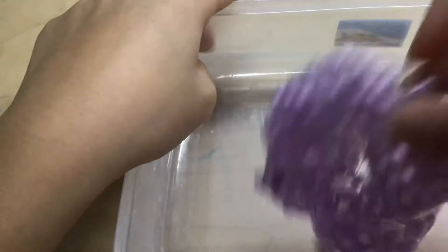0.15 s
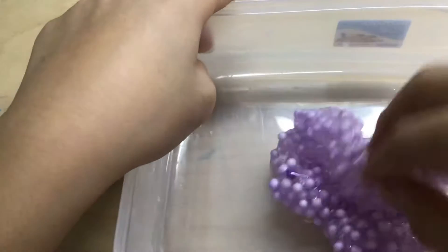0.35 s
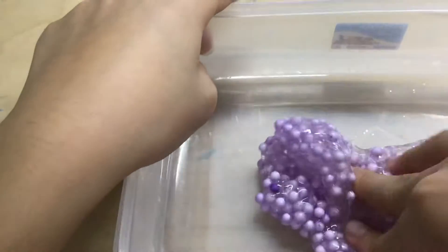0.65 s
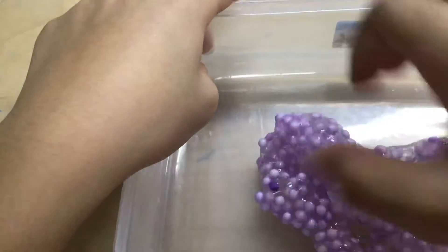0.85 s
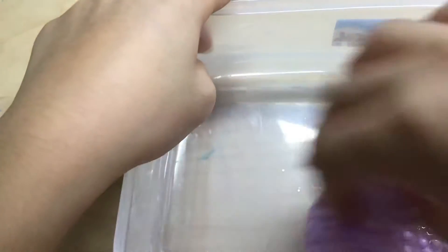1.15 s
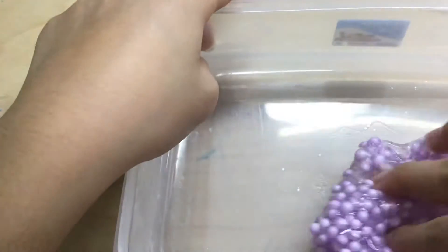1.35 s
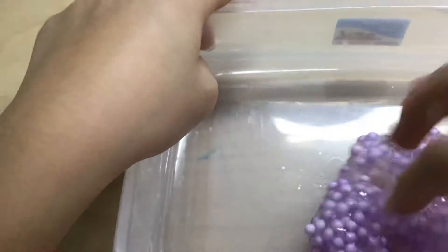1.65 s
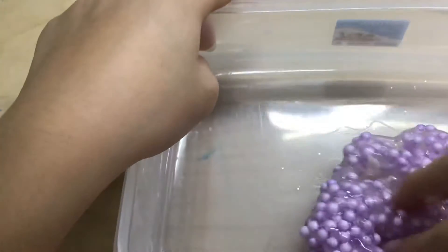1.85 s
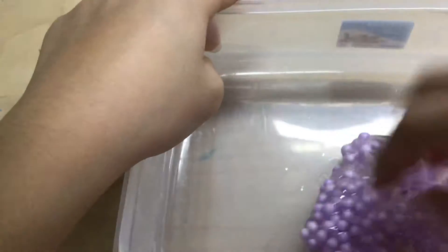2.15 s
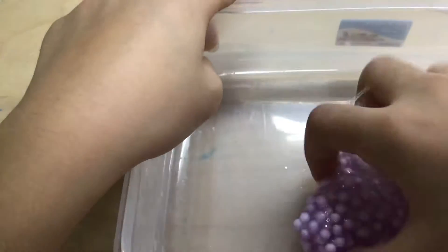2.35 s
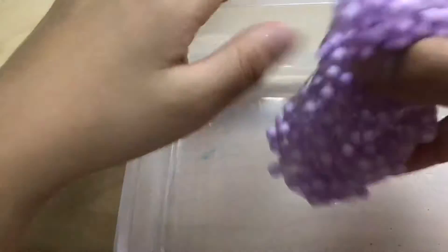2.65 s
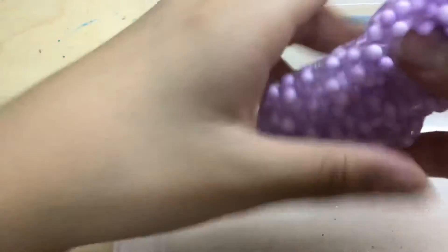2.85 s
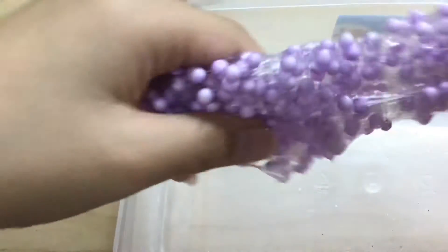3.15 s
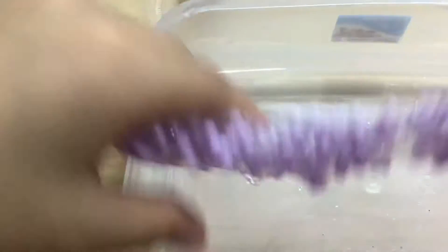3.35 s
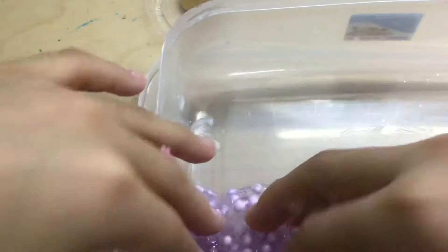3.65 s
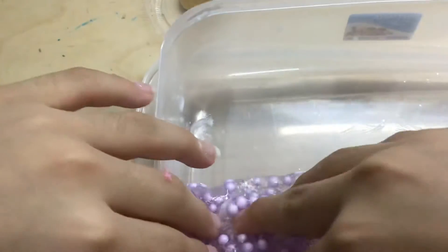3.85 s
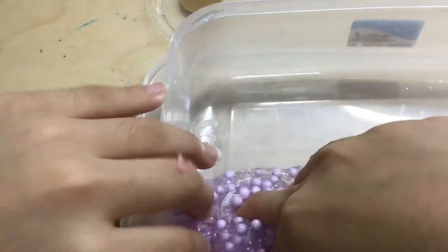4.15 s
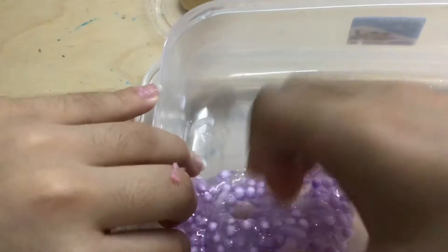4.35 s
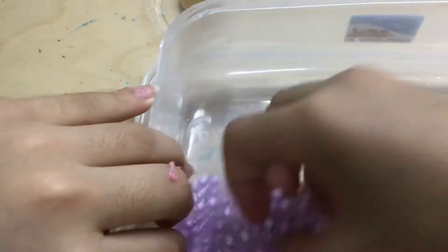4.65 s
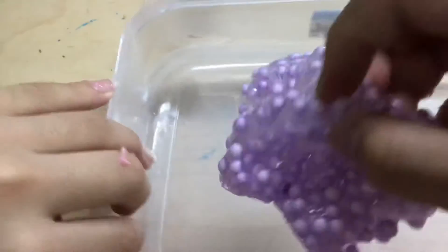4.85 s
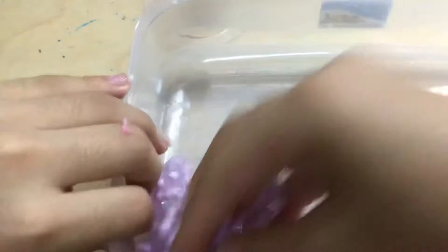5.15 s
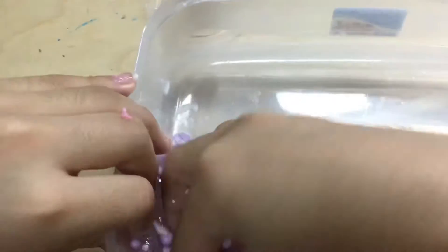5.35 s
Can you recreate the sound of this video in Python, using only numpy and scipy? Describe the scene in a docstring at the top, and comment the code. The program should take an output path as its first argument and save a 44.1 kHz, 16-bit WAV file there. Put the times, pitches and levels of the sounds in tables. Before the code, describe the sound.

Very close to the microphone, hands squeeze slime full of foam beads in a thin plastic tub. Small crisp pops, dull plastic knocks and soft low thumps come in clusters, thickening to the hardest hit just after two seconds. After a quieter stretch with a faint slide, a slap restarts the crunching, then a quick finger stutter, sharp snaps, a short rest and a final crackling flurry.

```python
"""A lump of slime full of foam beads is kneaded and slapped about in a thin plastic tub, close to the microphone.
It opens with a soft floor thump and quick clusters of bursting air pockets (torn film noise, a ringing pocket) and
wall knocks (rough contact on modes). They thicken to the hardest hit at 2.26 s, with grainy crackle in between.
After a lull with a hissing slide, a slap at 3.37 s starts them again; at 3.7 s a finger judders in eight slips.
Sharp pops follow from 4.25 s, then a short rest, and a last flurry from 5.1 s ends in dense crackle."""
import sys
import numpy as np
from scipy import signal
from scipy.fft import rfft, irfft
from scipy.io import wavfile
from scipy.ndimage import uniform_filter1d

SR = 44100
rng = np.random.default_rng(int(sys.argv[2]) if len(sys.argv) > 2 else 0)


def materialize(psi):
    """Save the field psi as 16-bit PCM at rate SR to the path in sys.argv[1].

    A 1-D psi becomes a single channel; in a 2-D psi each row is a channel.
    """
    bounded = np.clip(np.atleast_2d(psi).T, -1, 1)
    quanta = np.round(bounded * 32767).astype(np.int16)
    wavfile.write(sys.argv[1], SR, quanta)


N = 242991

# air pockets bursting: t/s, peak level/dB, pocket f/Hz, nominal tear length/s, film hiss level re pocket/dB
POPS = [(0.163, -40, 3300, 0.0062, -10), (0.1783, -32.5, 3060, 0.0026, -4),
        (0.181, -27.5, 6200, 0.00081, 1), (0.205, -47, 4470, 0.0015, -23), (0.505, -41, 7800, 0.0043, -6),
        (0.517, -35, 2700, 0.0016, -16), (0.537, -30.5, 5100, 0.0018, 0.5), (0.598, -53, 8500, 0.0022, -14),
        (0.69, -53, 4130, 0.0026, -13), (0.7072, -28.5, 5340, 0.0011, -4.5), (0.738, -36, 3180, 0.013, 1.5),
        (0.7744, -24, 6000, 0.003, -2), (0.935, -33.5, 5800, 0.0009, -17), (0.944, -45, 4520, 0.0021, -20),
        (0.973, -43, 5630, 0.00099, -12), (1.0255, -50.5, 4400, 0.0054, -26),
        (1.0939, -55, 5720, 0.002, -20), (1.1239, -56, 12600, 0.002, -4), (1.147, -52, 12300, 0.002, -2),
        (1.367, -42.5, 4520, 0.00064, -10), (1.391, -49, 7500, 0.0055, -22),
        (1.3984, -48.5, 3620, 0.003, -13), (1.535, -53, 5470, 0.0034, -7),
        (1.5748, -36.5, 6400, 0.0025, -10), (1.581, -37.5, 7460, 0.0042, -22),
        (1.6138, -24, 5500, 0.0055, 0.5), (1.6393, -40, 7850, 0.0018, -14), (1.644, -36, 7500, 0.0016, -6),
        (1.715, -46, 6670, 0.002, -18), (1.73, -43.5, 4830, 0.0028, -18), (1.7353, -44, 5720, 0.0036, -23),
        (1.777, -51, 8600, 0.0058, -1), (1.793, -46.5, 5470, 0.0028, -10), (1.8338, -39, 7740, 0.00053, -1),
        (1.8403, -40.5, 6130, 0.002, 0), (1.9, -44.5, 7700, 0.0014, -16), (1.908, -45.5, 6080, 0.0016, -10),
        (1.921, -46, 8100, 0.0012, -2), (1.945, -46, 6040, 0.00084, -23), (1.96, -36, 3700, 0.0031, -29),
        (1.9645, -44, 6000, 0.0028, -13), (1.9985, -52.5, 6550, 0.0047, 1),
        (2.0476, -34.5, 7300, 0.00081, 1), (2.1007, -34, 6260, 0.0009, -27),
        (2.103, -38, 5630, 0.0035, -29), (2.1155, -39, 12300, 0.0029, -1),
        (2.133, -21.5, 5600, 0.0022, 0.5), (2.248, -24, 5200, 0.0029, -16), (2.258, -15, 6300, 0.0032, -3),
        (2.303, -47, 5140, 0.0022, -1), (2.3524, -40.5, 7200, 0.0036, -2), (2.385, -50, 5140, 0.0024, -17),
        (2.4154, -35.5, 6900, 0.0012, -7), (2.4196, -42.5, 7200, 0.0029, -8),
        (2.433, -52, 12000, 0.0017, -4), (2.458, -38.5, 11600, 0.00067, -18),
        (2.467, -42.5, 3100, 0.0037, 2), (2.4866, -48, 5290, 0.0023, 7), (2.5, -47.5, 2780, 0.0043, -10),
        (2.529, -38.5, 4570, 0.0016, -19), (2.5533, -45, 6270, 0.0014, 1), (2.558, -37, 5800, 0.0027, 0.5),
        (2.628, -52, 6330, 0.00092, -14), (2.6534, -35.5, 4600, 0.00025, -2),
        (2.673, -41.5, 6100, 0.0018, -1), (2.7106, -47.5, 2680, 0.0039, -10), (2.75, -62, 5000, 0.002, -20),
        (2.809, -59, 5200, 0.0017, -20), (2.857, -57, 5000, 0.0018, -20), (2.925, -58, 6500, 0.002, -20),
        (2.942, -56.5, 4700, 0.0032, -20), (3.111, -58, 5000, 0.0017, -20),
        (3.131, -49.5, 11900, 0.0009, 4), (3.151, -60, 6000, 0.0019, -16), (3.171, -60, 5500, 0.002, -20),
        (3.375, -36, 5340, 0.0014, -2), (3.425, -43.5, 6140, 0.021, -7), (3.4396, -22, 3050, 0.0057, -29),
        (3.456, -30, 4280, 0.0051, -9), (3.521, -50, 5480, 0.0038, -12), (3.562, -43.5, 5600, 0.0012, -8),
        (3.575, -48, 6340, 0.004, -9), (3.63, -52, 7820, 0.0013, -4), (3.646, -43, 8000, 0.00073, -4),
        (3.667, -50, 5820, 0.00099, -18), (3.705, -60, 12600, 0.0021, 1), (3.801, -61, 12800, 0.0035, 6),
        (3.8815, -90, 7320, 0.0021, -15.5), (3.8976, -55, 4600, 0.0021, -18), (3.94, -46, 6660, 0.0016, -9),
        (3.954, -54, 7040, 0.0071, -23), (4.251, -37.5, 7900, 0.0012, -1), (4.2721, -22, 5800, 0.0016, -2),
        (4.279, -35, 7740, 0.0017, 0), (4.29, -39.5, 3330, 0.0029, -10), (4.3241, -35, 8600, 0.002, -17),
        (4.3282, -38, 4940, 0.0016, -24), (4.4443, -47, 2760, 0.005, -18), (4.4564, -28, 5400, 0.00079, -1),
        (4.4698, -23.5, 5900, 0.00048, 1), (4.484, -63, 3170, 0.0019, -18), (4.5083, -46, 6800, 0.0022, -9),
        (4.55, -53, 12300, 0.0027, -3), (4.572, -52, 12000, 0.0033, 7), (4.586, -49, 6220, 0.0031, 14),
        (4.607, -52, 8870, 0.0024, -11), (4.639, -46, 10400, 0.003, -11), (4.643, -49, 9900, 0.0047, -13),
        (5.12, -41, 4610, 0.0014, -1), (5.124, -30.5, 2780, 0.0096, -8), (5.167, -42, 5760, 0.0035, 0),
        (5.173, -36.5, 2970, 0.00097, -10), (5.229, -52, 6500, 0.0015, -18),
        (5.242, -34, 5940, 0.0011, -19), (5.261, -47, 8700, 0.0011, -12), (5.286, -51, 10000, 0.002, -14),
        (5.303, -39, 5960, 0.0027, -22), (5.34, -53, 4330, 0.0022, -17), (5.352, -48, 7160, 0.00092, -21),
        (5.3632, -36.5, 10100, 0.0016, -24), (5.371, -46.5, 4680, 0.0023, -17),
        (5.4657, -45, 14800, 0.0028, -5), (5.478, -42, 7200, 0.0023, 2), (5.489, -44, 11700, 0.0023, -8),
        (5.5, -51, 13800, 0.0044, -10)]
# beads and fingers knock the walls: t/s, peak level/dB, struck region f/Hz, nominal contact length/s
KNOCKS = [(0.1619, -29.5, 640, 0.0025), (0.181, -23, 1000, 0.0076), (0.19, -31, 575, 0.01),
          (0.233, -37, 1280, 0.0039), (0.253, -36, 716, 0.0034), (0.499, -39, 1390, 0.016),
          (0.5124, -24.5, 560, 0.0094), (0.535, -23, 1240, 0.011), (0.609, -33.5, 560, 0.023),
          (0.691, -36, 872, 0.0023), (0.7024, -29, 885, 0.024), (0.7395, -20, 780, 0.015),
          (0.778, -17.5, 420, 0.0019), (0.9332, -16.5, 655, 0.0039), (0.944, -23.5, 615, 0.0038),
          (0.969, -41.5, 571, 0.02), (1.029, -35, 523, 0.0054), (1.048, -41, 600, 0.0077),
          (1.256, -48, 312, 0.0074), (1.311, -37.5, 390, 0.0024), (1.333, -41, 514, 0.0028),
          (1.351, -35, 1340, 0.0071), (1.3945, -25, 323, 0.016), (1.541, -31.5, 450, 0.0017),
          (1.548, -31.5, 516, 0.0058), (1.581, -29.5, 610, 0.0095), (1.6165, -13.5, 383, 0.004),
          (1.633, -34, 388, 0.013), (1.774, -29.5, 310, 0.011), (1.8058, -42, 1220, 0.017),
          (1.817, -37, 342, 0.0026), (1.85, -37, 350, 0.0099), (1.8736, -34, 880, 0.0058),
          (1.8803, -33, 1160, 0.0062), (1.903, -41, 1280, 0.005), (1.925, -29, 416, 0.015),
          (1.947, -46, 301, 0.017), (1.9576, -15.0, 364, 0.0088), (2.048, -30.5, 586, 0.0053),
          (2.0626, -33, 328, 0.0076), (2.102, -23.5, 900, 0.012), (2.133, -20.5, 726, 0.0053),
          (2.2468, -16, 960, 0.0089), (2.256, -13, 705, 0.012), (2.317, -42, 1630, 0.01),
          (2.386, -38, 513, 0.0031), (2.4133, -36, 1420, 0.0081), (2.4228, -29.5, 604, 0.0078),
          (2.452, -37.5, 587, 0.0054), (2.4716, -32.5, 398, 0.006), (2.494, -39, 657, 0.0051),
          (2.528, -32.5, 1010, 0.0088), (2.5345, -34.5, 302, 0.01), (2.5538, -22, 600, 0.0049),
          (2.559, -25.5, 344, 0.0062), (2.585, -37.5, 301, 0.013), (2.6014, -39, 334, 0.0054),
          (2.6124, -35, 332, 0.0047), (2.654, -23, 524, 0.002), (2.66, -28.5, 315, 0.012),
          (2.6728, -32, 322, 0.011), (2.714, -39.5, 870, 0.0026), (2.7527, -41.5, 861, 0.005),
          (2.7604, -37, 577, 0.0029), (2.81, -37, 535, 0.0063), (2.8588, -35.5, 550, 0.0069),
          (2.948, -43.5, 546, 0.0057), (3.11, -37, 490, 0.0077), (3.3743, -15, 597, 0.0042),
          (3.4153, -19.5, 700, 0.0032), (3.426, -36, 1550, 0.013), (3.4406, -22, 740, 0.0037),
          (3.4444, -32, 530, 0.025), (3.465, -29.5, 950, 0.038), (3.4793, -29, 800, 0.0063),
          (3.4874, -29, 614, 0.011), (3.51, -27.5, 890, 0.0089), (3.5183, -23.5, 460, 0.0035),
          (3.5262, -29, 355, 0.0038), (3.561, -29.5, 570, 0.0063), (3.8015, -32, 305, 0.014),
          (3.89, -36, 334, 0.0011), (3.901, -35, 1070, 0.0043), (3.9394, -35.5, 288, 0.0082),
          (3.97, -42.5, 614, 0.0074), (4.043, -43, 1010, 0.026), (4.0721, -30, 324, 0.0055),
          (4.247, -38, 711, 0.025), (4.2742, -15.5, 950, 0.0037), (4.324, -28, 581, 0.0031),
          (4.334, -38, 350, 0.0057), (4.4458, -22.5, 610, 0.0054), (4.4563, -24, 605, 0.0055),
          (4.469, -22.5, 1420, 0.0072), (4.4875, -19.5, 600, 0.001), (4.509, -36.5, 764, 0.0047),
          (4.624, -44.5, 685, 0.0073), (4.863, -34.5, 473, 0.0033), (5.07, -40, 1070, 0.013),
          (5.123, -31.5, 1080, 0.018), (5.1426, -35, 514, 0.0022), (5.1745, -26.5, 372, 0.002),
          (5.242, -35, 735, 0.0058), (5.3036, -32, 920, 0.0043), (5.3682, -30, 1390, 0.009),
          (5.4082, -41, 325, 0.0042), (5.476, -38, 760, 0.017)]
# floor thumps, tuned by the slime lying on it: t/s, peak level/dB, f/Hz, nominal t60/s
THUMPS = [(0.076, -36.5, 97, 0.07), (0.162, -30, 72.6, 0.27), (0.184, -30, 123, 0.08),
          (0.52, -35, 193, 0.18), (0.537, -17.5, 112.0, 0.12), (0.778, -22, 97.5, 0.08),
          (0.931, -32.5, 113, 0.12), (1.25, -34.5, 93, 0.12), (1.405, -28.5, 129, 0.12),
          (1.544, -35, 76, 0.4), (1.588, -29.5, 96.6, 0.4), (1.614, -26, 116.5, 0.12),
          (1.642, -24, 85, 0.05), (1.77, -23.5, 97, 0.18), (1.805, -33, 93, 0.12),
          (1.933, -34.5, 146, 0.27), (1.957, -18.5, 91.4, 0.27), (2.061, -29.5, 100.3, 0.4),
          (2.094, -30, 67, 0.18), (2.133, -34.5, 112, 0.12), (2.241, -35, 164, 0.18),
          (2.258, -17, 103.3, 0.08), (2.469, -37, 82, 0.18), (2.534, -30, 98.3, 0.18),
          (2.6, -32.5, 75.5, 0.4), (2.66, -28, 127, 0.05), (3.372, -29.5, 86.8, 0.4),
          (3.41, -33.5, 113.9, 0.4), (3.442, -25, 93.8, 0.27), (3.457, -27, 86, 0.4),
          (3.496, -27, 115.6, 0.12), (3.574, -29, 80.5, 0.08), (3.692, -35.5, 92, 0.18),
          (3.81, -30.5, 189, 0.05), (4.073, -28, 168.6, 0.08), (4.275, -26.5, 92.8, 0.18),
          (4.286, -25.5, 128, 0.08), (4.445, -31, 106.3, 0.27), (4.862, -40, 120, 0.071),
          (5.128, -26.5, 77, 0.08), (5.407, -29, 159.5, 0.12)]
# steady kneading between bursts: t/s, crackle level/dB, wall rubbing level/dB, floor load level/dB, table sway level/dB
KNEADING = [(0.0, -66, -63, -64, -32), (0.06, -86, -73.5, -63, -46), (0.3, -76.5, -70, -66, -57),
            (0.47, -71.5, -60, -67, -51), (0.66, -75, -67, -67, -42), (0.9, -75.5, -66, -48.5, -41.5),
            (1.04, -69, -65, -61, -52), (1.2, -79.5, -71, -67, -45), (1.32, -67, -60.5, -46, -41.5),
            (1.47, -79.5, -66, -58, -68), (1.63, -66.5, -68, -58, -29), (1.78, -75, -70, -64, -35.5),
            (1.9, -75.5, -65, -49, -65), (2.12, -64.5, -64, -48, -36.5), (2.22, -70.5, -65, -50, -43.5),
            (2.3, -58, -52, -64, -45), (2.5, -69, -61.5, -45, -41), (2.72, -81, -75, -43, -44),
            (2.98, -76.5, -75, -49.5, -49.5), (3.13, -75, -69, -43.5, -44), (3.341, -86, -86.5, -60, -59),
            (3.45, -59.5, -49.5, -54, -49), (3.62, -67.5, -62, -49.5, -63), (3.94, -68, -61.5, -48.5, -42),
            (4.14, -79, -72, -67, -65), (4.24, -63.5, -57.5, -46, -52), (4.41, -77, -69.5, -68, -58),
            (4.54, -64, -58, -56, -46.5), (4.64, -63.5, -57.5, -57, -48), (4.7, -70, -67, -60, -49),
            (4.85, -73, -66.5, -57, -54), (4.979, -83, -73.5, -65, -68), (5.069, -62, -57, -64, -42.5),
            (5.2, -65.5, -62.5, -47.5, -44.5), (5.36, -68, -63, -59, -43), (5.43, -72.5, -63, -49, -43),
            (5.51, -56, -54.5, -46.5, -37)]
# modes of the tub walls, low to high: f/Hz, relative level/dB, t60/s
WALLS = [(201, -6, 0.033), (262.6, -3, 0.061), (333.2, -1, 0.043), (488.4, -5.5, 0.05), (585, -0.5, 0.028),
         (725, 2.5, 0.019), (886, 3.5, 0.019), (1125, 4, 0.012), (1272, -0.5, 0.023), (1453, -0.5, 0.017),
         (1770, 1.5, 0.0032), (2045, -17.5, 0.042), (2597, -20, 0.045)]
# modes of the tub floor: f/Hz, relative level/dB, t60/s
FLOOR = [(54, -4.5, 0.066), (80, -2, 0.077), (91, 1, 0.076), (123, -0.5, 0.044), (151, -1, 0.03)]
# colour laid over the crackle: f/Hz, relative gain/dB
CRACKLE_COLOUR = [(1060, -26), (1800, -2.5), (2390, -3), (2900, -1), (3140, -5), (4790, -3), (5590, -4),
                  (7290, -3.5), (12100, -15), (16000, -14.5)]
# colour of the room noise: f/Hz, relative gain/dB
ROOM_COLOUR = [(24, -31.5), (40, -7), (101, -5.5), (209, -22), (305, -22.5), (2380, -47.5), (3380, -52),
               (5580, -49.5), (6020, -57.5), (11600, -50.5), (16000, -53.5)]
# a finger slides over the wet plastic: start t/s, end t/s, hiss level/dB, upper cutoff f/Hz, airy band re hiss/dB
SLIDES = [(0.356, 0.474, -67.5, 2920, -32), (2.271, 2.336, -60, 1500, -19),
          (3.009, 3.099, -45.5, 1470, -25.5), (3.454, 3.533, -50, 1490, -16), (3.668, 3.817, -52, 900, -36),
          (4.189, 4.27, -54.5, 1160, -19)]

# the slime works on around each event: level re its peak/dB, build-up/s over 60 dB, dying/s over 60 dB
AFTER_POP, AFTER_KNOCK, AFTER_SLAP = (-32, 0.02, 0.19), (-30.5, 0.012, 0.22), (-32, 0.013, 0.25)
AFTER_THUMP, AFTER_PUSH = (-27.5, 0.03, 0.31), (-17.5, 0.08, 0.47)
SQUELCH_DB = -1   # soft slaps relative to the bead rubbing
# lead of the small pockets, dB per octave: its mean, its wander (rms), its rise per dB of crackle over rubbing
TILT_DB, TILT_SWING_DB, TILT_PER_DB = 2.5, 2.5, 0.4
# a finger sticks and slips over the tub floor
JUDDER_S, JUDDER_PER_S, JUDDER_PULSE_S = 3.694, 72, 0.0011
JUDDER_DB, JUDDER_SWELL_DB = -30, 7.5   # base peak of a slip, extra at the height of the run
ROOM_DB, CUTOFF_HZ = -57, 16500


def from_db(db):
    """Turns decibels into an amplitude factor."""
    return 10 ** (np.asarray(db) / 20)


def rms_one(x):
    """Scales a signal to rms 1."""
    return x / np.sqrt(np.mean(x ** 2) + 1e-20)


def band(x, order, edges_hz, kind="band"):
    """Butterworth filter: keeps one region of the spectrum."""
    return signal.sosfilt(signal.butter(order, edges_hz, kind, fs=SR, output="sos"), x)


def smooth_wander(size):
    """Slow random wander of rms 1: noise averaged twice over size samples."""
    once = uniform_filter1d(rng.standard_normal(N), size=size)
    return rms_one(uniform_filter1d(once, size=size))


def ring(clicks, hz, t60):
    """A damped resonance: a unit click sets a sine of starting height 1 ringing."""
    r, w = from_db(-60 / (t60 * SR)), 2 * np.pi * hz / SR
    return signal.lfilter([0, np.sin(w)], [1, -2 * r * np.cos(w), r * r], clicks + 1e-18)


def add(out, s, sound, peak_db):
    """Lays a sound of the given peak into out at time s."""
    at = max(round(s * SR), 0)
    scaled = from_db(peak_db) * sound / np.abs(sound).max()
    out[at:at + len(sound)] += scaled[:N - at]


def colour(x, spectrum):
    """Shapes x by gains at given frequencies, joined along a log-frequency axis; rms 1."""
    hz, db = np.transpose(spectrum)
    bins = np.maximum(np.arange(N // 2 + 1) * SR / N, 1)
    gain_db = np.interp(np.log(bins), np.log(hz), db)
    return rms_one(irfft(rfft(x) * from_db(gain_db), N))


def grains(per_s, spread_db, clump_db):
    """Random clicks of either sign and uneven size, whose sizes swell in clumps of some 10 ms."""
    clumps = smooth_wander(300)
    sizes = from_db(spread_db * np.minimum(rng.exponential(1, N), 4) + clump_db * clumps)
    signs = rng.choice([-1, 1], N)
    return sizes * signs * (rng.random(N) < per_s / SR)


def pops():
    """A torn film gives a burst of noise; the pocket behind it rings a few cycles, the film hisses on top."""
    out, t = np.zeros(N), np.arange(1800) / SR
    for s, db, hz, length, film_db in POPS:
        tear = t / np.clip(0.33 * length, 0.0001, 0.006)
        tail = from_db(-22.5 - 60 * t / 0.086)   # faint noise that outlasts the tear
        burst = rng.standard_normal(len(t)) * (tear * np.exp(1 - tear) + tail)
        pocket = rms_one(ring(burst - np.roll(burst, 1), hz, 15.0 / hz))
        rim = rms_one(band(burst, 2, [hz / 5.6, min(1.78 * hz, 18000)]))   # the open rim, broader
        film = rms_one(band(burst, 2, 9000, "high"))
        add(out, s, pocket + 1.03 * rim + from_db(film_db) * film, db)
    return out


def knocks():
    """A short rough contact drives the wall modes, most those near the struck region; squeezed-out air plops."""
    out, t = np.zeros(N), np.arange(3600) / SR
    hz, level_db, t60 = np.transpose(WALLS)
    for s, db, centre_hz, length in KNOCKS:
        decay_s = np.clip(0.4 * length, 0.0002, 0.012)
        grip = np.minimum(t / (0.2 * length), 1) * np.exp(-t / decay_s)
        rough = rng.standard_normal(len(t)) * grip
        force = signal.lfilter([1], [1, -1.4, 0.5], rough)   # soft skin: little force in the treble
        near_db = level_db - 5.66 * np.abs(np.log2(hz / centre_hz))
        near_db = near_db + 3.5 * rng.standard_normal(len(hz))   # every blow shares out differently
        walls = sum(from_db(g) * ring(force, f, d) for f, g, d in zip(hz, near_db, t60))
        plop = rms_one(ring(force, centre_hz, 14.0 / centre_hz))
        add(out, s, rms_one(walls) + 0.49 * plop, db)
    return out


def thumps():
    """The floor is pushed down over a few ms and swings out as one damped tone."""
    out, t = np.zeros(N), np.arange(14000) / SR
    for s, db, hz, t60 in THUMPS:
        decay = from_db(-60 * t / np.clip(t60, 0.03, 0.35))
        swing = np.sin(2 * np.pi * hz * t) * decay
        add(out, s, -swing * np.minimum(t / 0.0031, 1), db)
    return out


def kneading():
    """Skin and beads peel off the slime all the time: crackle in air, rubbing in walls, load on floor and table."""
    s, *columns = np.transpose(KNEADING)
    t = np.arange(N) / SR
    crackle_db, rubbing_db, loading_db, sway_db = (np.interp(t, s, c) for c in columns)
    tilt_db = TILT_DB + TILT_SWING_DB * smooth_wander(3000) + TILT_PER_DB * (crackle_db - rubbing_db)
    crackle = colour(crackling(tilt_db), CRACKLE_COLOUR)
    beads = body(grains(2500, 3.5, 2.5), WALLS[4:])   # hard beads reach the high modes
    slaps = body(grains(500, 4.0, 3.0), WALLS[:5])    # soft slaps reach the low ones
    load = body(grains(200, 5.2, 3.4), FLOOR)
    sway = rms_one(band(rng.standard_normal(N), 2, [6, 22]))
    return (stirred(crackle_db, POPS, AFTER_POP) * crackle
            + stirred(rubbing_db, KNOCKS, AFTER_KNOCK) * beads
            + stirred(rubbing_db + SQUELCH_DB, KNOCKS, AFTER_SLAP) * slaps
            + stirred(loading_db, THUMPS, AFTER_THUMP) * load
            + stirred(sway_db, THUMPS, AFTER_PUSH) * sway)


def crackling(tilt_db):
    """Small clicks from pockets of ten sizes, each clumping on its own; tilt in dB per octave favours small ones."""
    out, together = np.zeros(N), np.abs(grains(60000, 0, 2.0))   # sizes also swell together
    for hz in np.geomspace(1900, 14500, 10):
        clicks = grains(580, 1.2, 5.3) * together
        pockets = rms_one(ring(clicks, hz, 2.3 / hz))
        out += from_db(tilt_db * np.log2(hz / 5000)) * pockets * np.sqrt(hz)
    return out


def body(force, modes):
    """Steady small forces ring a set of modes of alternating sign; rms 1."""
    return rms_one(sum(from_db(db) * ring(force, hz, t60) * (-1) ** k
                       for k, (hz, db, t60) in enumerate(modes)))


def stirred(steady_db, events, rule):
    """Amplitude of a steady level plus, in power, a swell that builds up to each event and dies after it."""
    under_db, build, dying = rule
    t = np.arange(0, N, 64) / SR
    event_s, peak_db = (np.array([row[i] for row in events]) for i in (0, 1))
    late = t[:, None] - event_s
    fall_db = np.where(late < 0, 60 * late / build, -60 * late / dying)
    power = from_db(2 * (fall_db + under_db + peak_db)).sum(axis=1)
    return np.sqrt(from_db(2 * steady_db) + np.interp(np.arange(N) / SR, t, power))


def judder(count=8):
    """Each slip is a sharp dip and a slower rebound that sets the walls going; the run swells early, then tires."""
    out, t = np.zeros(N), np.arange(3000) / SR
    push = np.exp(-np.abs(t - 0.003) / JUDDER_PULSE_S)
    dip = -signal.lfilter([1], [1, -1.5, 0.56], push)
    rebound = -0.9 * rms_one(ring(dip, 195, 0.009))
    pulse = rms_one(rebound + rms_one(dip))
    jerk = np.diff(dip, prepend=0)
    for k, (late, uneven, *shares) in enumerate(rng.standard_normal((count, 10))):
        walls = sum(from_db(g + 4.6 * share) * ring(jerk, hz, t60)
                    for (hz, g, t60), share in zip(WALLS[2:10], shares))
        s = JUDDER_S - 0.003 + k / JUDDER_PER_S + 0.00099 * late   # the dip lies 3 ms into the pulse
        swell_db = JUDDER_SWELL_DB * np.exp(-((k - 2.6) / 1.03) ** 2)
        add(out, s, pulse + 0.91 * rms_one(walls), JUDDER_DB + swell_db + 1.9 * uneven)
    return out


def slides():
    """Friction: a fine-grained hiss that swells and fades, with a faint airy band over it."""
    out = np.zeros(N)
    for start, end, db, top_hz, airy_db in SLIDES:
        at, size = round(start * SR), round((end - start) * SR)
        noise = grains(9000, 3.0, 1.6)[:size]
        hiss = rms_one(band(noise, 4, [300, top_hz]))
        airy = rms_one(band(noise, 2, [4500, 7000]))
        friction = hiss + from_db(airy_db) * airy
        out[at:at + size] += from_db(db) * friction * signal.windows.tukey(size, 0.45)
    return out


def room():
    """Steady background: random noise, strongest in the bass."""
    return from_db(ROOM_DB) * colour(rng.standard_normal(N), ROOM_COLOUR)


def scene():
    """Sums the slime, the tub, the fingers and the room into one channel."""
    return (pops() + knocks() + thumps() + kneading() + judder() + slides() + room())[None]


def record(dry):
    """A steep low-pass cuts the top of the treble."""
    return signal.sosfilt(signal.cheby2(12, 50, CUTOFF_HZ, fs=SR, output="sos"), dry)


dry = scene()
out = record(dry)
materialize(out)
```